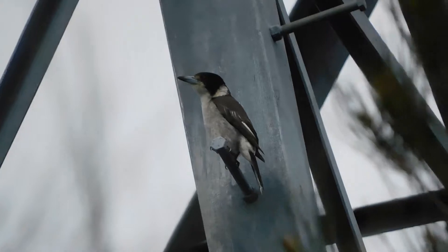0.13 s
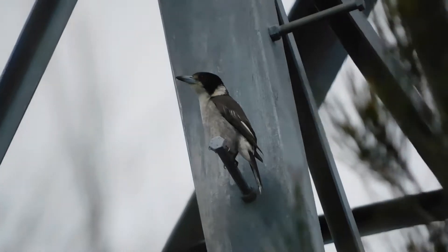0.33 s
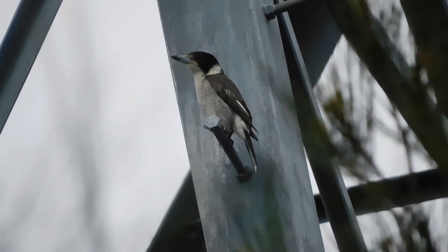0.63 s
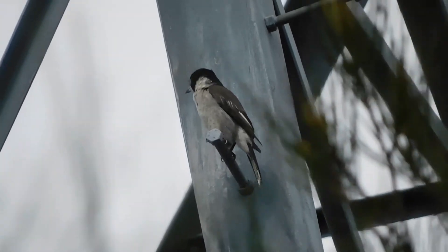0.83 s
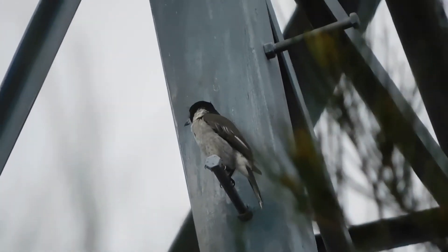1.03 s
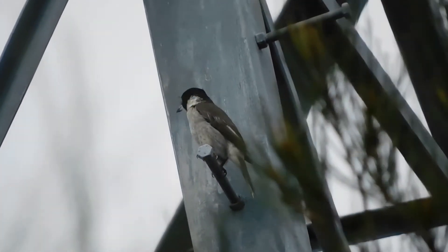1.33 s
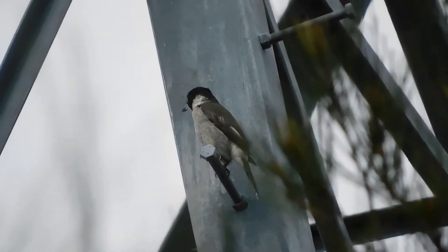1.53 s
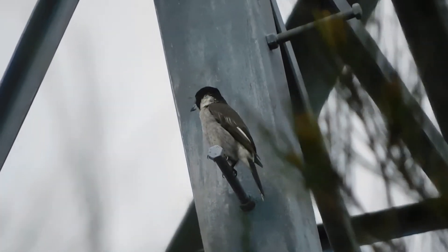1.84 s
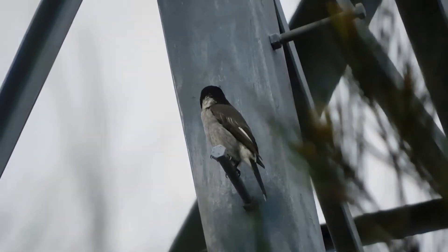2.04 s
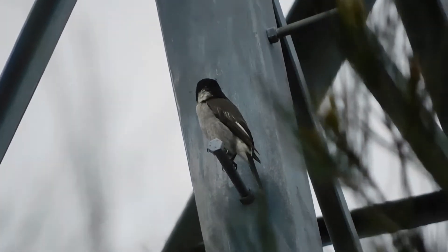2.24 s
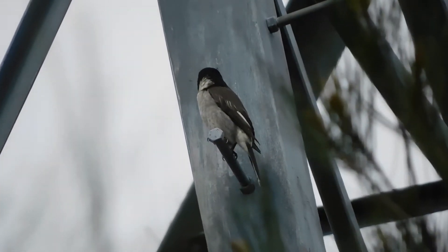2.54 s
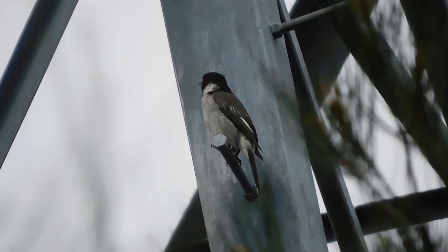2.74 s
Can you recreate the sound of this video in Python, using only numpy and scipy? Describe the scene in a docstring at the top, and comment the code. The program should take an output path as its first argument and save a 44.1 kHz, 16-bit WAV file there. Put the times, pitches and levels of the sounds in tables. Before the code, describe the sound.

A butcherbird calls outdoors, slightly to the right with a faint echo. A short rasp at 0.3 seconds leads into three brief reedy notes at about 0.4, 0.6 and 0.9 seconds. Something knocks once near 0.5. A faint hoarse tone slides down around 1.2. Thin, quiet whistles scatter through the first 1.5 seconds, then return sparsely after 2. Wind and distant traffic rumble low throughout.

```python
"""At a steel tower, a butcherbird gives a short rasp and three reedy notes, among thin slurred whistles.
The rasp is puffs of air ringing in its throat; each note is a clear tone with a buzz above it.
Something knocks once, a hoarse tone slides down, and the surroundings throw back a faint echo.
Under it all lies a steady low rumble of wind and distant traffic."""
import sys
import numpy as np
from scipy import signal
from scipy.fft import rfft, irfft
from scipy.io import wavfile
from scipy.ndimage import uniform_filter1d

SR = 44100
rng = np.random.default_rng(int(sys.argv[2]) if len(sys.argv) > 2 else 0)


def pcm_store(signal):
    """Save signal as 16-bit PCM."""
    levels = np.round(np.clip(np.atleast_2d(signal), -1, 1) * 32767)
    wavfile.write(sys.argv[1], SR, levels.astype(np.int16).T)


N = 126567


def amp(db):
    """Turns decibels into a number to multiply by."""
    return 10 ** (np.asarray(db) / 20)


def unit(x):
    """Scales a signal to an average (rms) level of 1."""
    return x / np.sqrt(np.mean(x ** 2) + 1e-20)


def look_up(rows, hz, column=1):
    """Reads a table at any frequency, blending between its rows."""
    table = np.transpose(rows)
    return np.interp(np.log(hz + 1), np.log(table[0] + 1), table[column])


def add(mix, start_s, sound):
    """Mixes a sound in at its start time."""
    part = mix[round(start_s * SR):][:len(sound)]
    part += sound[:len(part)]


def fade(t, rise_s, fall_s):
    """A loudness curve that rises, holds and falls smoothly."""
    fade_in = np.sin(np.pi / 2 * np.clip(t / rise_s, 0, 1))
    fade_out = np.sin(np.pi / 2 * np.clip((t[-1] - t) / fall_s, 0, 1))
    return fade_in * fade_out


def wander(size, hz):
    """A smooth random wobble, mostly slower than hz."""
    freqs = np.fft.rfftfreq(SR, 1 / SR)
    spectrum = rfft(rng.standard_normal(SR)) * np.exp(-(freqs / hz) ** 2)
    return unit(irfft(spectrum))[:size]


def ring(x, hz, width_hz):
    """Makes a sound ring around one pitch, which may slide."""
    turn = np.exp(2j * np.pi * np.cumsum(hz * np.ones(len(x))) / SR)
    decay = np.exp(-np.pi * width_hz / SR)
    ringing = signal.lfilter([1], [1, -2 * decay, decay ** 2], x / turn)
    return unit((turn * ringing).real)


# The rumble's tone. Each row: frequency in Hz, relative level in dB.
RUMBLE_TONE = [(12, -29), (20, 4), (59, -0.5), (103, -3), (140, -5), (232, -9), (274, -10.5), (324, -13),
               (393, -14.5), (505, -22), (725, -19), (1010, -20), (1380, -24.5), (2270, -35), (2470, -40.5),
               (3170, -47.5), (4430, -56), (5090, -58), (15500, -56.5)]
# Its width. Each row: frequency in Hz, level in dB of what differs between the ears against what they share.
RUMBLE_WIDTH = [(60, -28.3), (120, -28.5), (200, -26), (380, -16), (700, -12.7), (1290, -12), (2380, -6),
                (4400, -.3), (8000, .3)]
# Its lean to one side. Each row: frequency in Hz, left minus right level in dB.
RUMBLE_BALANCE = [(200, -.48), (1200, -1.1), (2800, -1.5), (7000, -.1)]
# Its slow drift. Each row: time in seconds, then change in dB of bass, low middle, middle and treble.
RUMBLE_DRIFT = [(.07, -4, -2.5, 0.5, 7), (.35, -1.5, 1.5, 0.5, 8.5), (.55, .5, -2, -1, 4.5),
                (0.952, -1.5, -1.5, .5, 2.5), (1.25, -1.5, -3, 1, 7), (1.47, .5, -4, .5, 3),
                (1.62, -3, -1.5, 0, 0.5), (1.82, 3.5, -1, -0.5, 0.5), (2.2, -2.5, 1, 0, 1.5),
                (2.58, 2, 1, 0, 1), (2.85, 0.5, 0, 0, 1)]
# Where the drift acts. Each row: frequency in Hz, then shares of bass, low middle, middle and treble.
DRIFT_SHARES = [(110, 1, 0, 0, 0), (180, 0, 1, 0, 0), (280, 0, 1, 0, 0), (500, 0, 0, 1, 0),
                (1600, 0, 0, 1, 0), (2800, 0, 0, 0, 1), (4500, 0, 0, 0, 1), (7500, 0, 0, 0, 0)]


def rumble(db=-37.5, flicker_db=1.17):
    """Wind and far traffic: deep noise, nearly alike in both ears, with a thin wide hiss on top."""
    size, hop = 4096, 1024  # the noise is built from short overlapping slices
    hz = np.fft.rfftfreq(size, 1 / SR)
    t = np.arange(N // hop + 5) * hop / SR
    a, b, c, d, flicker = rng.standard_normal((len(t), len(hz), 5)).T
    shared = a + 1j * b
    side = (c + 1j * d) * amp(look_up(RUMBLE_WIDTH, hz))[:, None]
    low_cut = hz ** 2 / (hz ** 2 + 14 ** 2)
    tone = amp(look_up(RUMBLE_TONE, hz)) * low_cut
    balance = amp(np.outer([.5, -.5], look_up(RUMBLE_BALANCE, hz)))
    slices = np.array([shared + side, shared - side]) * (tone * balance)[:, :, None]
    times, *bands = np.transpose(RUMBLE_DRIFT)
    drift_db = sum(np.outer(look_up(DRIFT_SHARES, hz, column), np.interp(t, times, band))
                   for column, band in enumerate(bands, 1))
    flicker = uniform_filter1d(flicker, size=3, axis=1)  # smooth over time
    flicker = unit(uniform_filter1d(flicker, size=24, axis=0))  # and over frequency
    slices *= amp(drift_db + flicker_db * flicker)
    air = signal.istft(slices, nperseg=size, noverlap=size - hop)[1][:, :N]
    return amp(db) * unit(air)


WAVER_SHARE, WAVER_HZ = 0.0063, 120  # how far and how fast a sung pitch wobbles
# Each row: start in seconds, length in seconds, first, middle and last pitch in Hz, level in dB.
THIN_WHISTLES = [ (0.064, 0.075, 2810, 2910, 2960, -60), (0.106, 0.019, 3500, 3660, 3800, -64),
                 (0.12, 0.14, 6150, 5350, 5130, -72), (0.136, 0.044, 2950, 2843, 2700, -54),
                 (.150, .100, 2070, 2200, 2130, -59), (0.179, 0.076, 2890, 2910, 2870, -75),
                 (.185, 0.059, 3200, 3280, 3300, -67), (.312, .026, 2740, 2320, 2100, -67),
                 (0.349, 0.031, 2010, 2064, 1960, -51), (.418, 0.018, 2950, 2900, 2870, -59),
                 (0.685, 0.041, 3040, 2970, 2870, -61), (0.749, 0.023, 3670, 3730, 3800, -68),
                 (0.769, 0.027, 3060, 2960, 2930, -62), (.975, 0.068, 2820, 2810, 2720, -66.5),
                 (0.998, 0.065, 3720, 3680, 3860, -72.5), (1.098, 0.034, 5100, 4510, 4580, -70),
                 (1.136, .044, 3880, 3620, 3650, -67), (1.17, 0.026, 3900, 3920, 3900, -60),
                 (1.190, 0.086, 3103, 2900, 3020, -57.5), (1.192, 0.033, 6200, 6000, 5800, -74),
                 (1.219, 0.05, 2530, 2652, 2610, -52.5), (0.762, 0.044, 1990, 1985, 1980, -57.5),
                 (1.294, 0.021, 2970, 2890, 2900, -62), (1.320, 0.028, 3550, 3520, 3470, -67),
                 (1.353, 0.07, 2840, 2996, 2850, -62), (1.432, .058, 4120, 4100, 3800, -73),
                 (2.052, 0.036, 1940, 2000, 2050, -60), (2.377, 0.104, 2230, 2250, 2365, -62),
                 (2.395, 0.077, 4520, 4500, 4420, -77), (2.841, 0.057, 4120, 4240, 4700, -66.5)]


def whistle(length, first_hz, middle_hz, last_hz, db):
    """An almost pure tone bends through three pitches."""
    t = np.arange(0, length, 1 / SR)
    bend = np.polyfit([0, .5, 1], [first_hz, middle_hz, last_hz], 2)
    hz = np.polyval(bend, t / length) * (1 + WAVER_SHARE * wander(len(t), WAVER_HZ))
    tone = unit(np.sin(2 * np.pi * np.cumsum(hz) / SR))
    flutter = 1 + 0.31 * wander(len(t), WAVER_HZ)
    edge_s = 0.29 * length
    return amp(db) * fade(t, edge_s, edge_s) * tone * flutter


def puffs(t, rate_hz, depth=0.53):
    """Hissing air is chopped into slightly uneven puffs."""
    count = np.cumsum(rate_hz * (1 + 0.088 * wander(len(t), rate_hz))) / SR
    pulses = abs(np.sin(np.pi * count)) ** 2.4
    return (1 - depth + depth * pulses) * rng.standard_normal(len(t))


# Each row: start in seconds, length in seconds, middle pitch in Hz, level in dB, share spent swelling.
THROAT_RASPS = [(0.072, .026, 5160, -65.5, 0.33), (.232, 0.082, 2710, -49, 0.9),
                (0.236, 0.075, 3500, -57.5, 0.53), (0.255, 0.078, 3940, -56.5, 0.76),
                (0.263, 0.065, 5600, -65, 0.36), (1.217, 0.025, 2350, -58, 0.46),
                (1.21, .19, 3900, -78, .25)]


def rasp(length, middle_hz, db, swell, climb=0.067):
    """Puffs of air ring in the bird's throat, climbing a little in pitch."""
    t = np.arange(0, length, 1 / SR)
    hz = middle_hz * (1 + climb * (t / length - .5))
    throat = ring(puffs(t, rate_hz=80), hz, width_hz=600)
    return amp(db) * fade(t, swell * length, (1 - swell) * length) * throat


# Where the buzz rings. Each row: pitch in Hz, width in Hz, relative level in dB.
BUZZ_RINGS = [(2500, 240, 5.5), (2790, 150, 1.5), (4450, 700, -14.5)]
# Each row: start in seconds, length in seconds, low pitch in Hz, end pitch in Hz, level in dB,
# level of the buzz against the tone in dB.
REEDY_NOTES = [(0.356, 0.0637, 1808, 2030, -41, -13.5), (.617, 0.08, 1740, 1974, -44, -9),
               (.905, 0.05, 1743, 1820, -42, -8)]


def reedy_note(length, low_hz, end_hz, db, buzz_db, buzz_hz=154, overtone_db=-33, sag_db=-13):
    """One side of the bird's voice box holds a clear tone that lifts at the end; the other buzzes."""
    t = np.arange(0, length, 1 / SR)
    scoop_hz = 128 * np.exp(-t / .005)  # the note drops onto its pitch
    hz = low_hz + (end_hz - low_hz) * (t / length) ** 3 + scoop_hz
    hz *= 1 + WAVER_SHARE * wander(len(t), WAVER_HZ)
    phase = 2 * np.pi * np.cumsum(hz) / SR
    tone = unit(np.sin(phase) + amp(overtone_db) * np.sin(2 * phase))
    flutter = 1 + .3 * wander(len(t), buzz_hz)
    air = puffs(t, buzz_hz)
    buzz = unit(sum(amp(level) * ring(air, pitch, width) for pitch, width, level in BUZZ_RINGS))
    loudness = amp(db + sag_db * (t / length) ** 2) * fade(t, rise_s=0.011, fall_s=0.0079)
    return loudness * (tone * flutter + amp(buzz_db) * buzz)


# Where the knock rings. Each row: pitch in Hz, width in Hz, relative level in dB.
KNOCK_RINGS = [(658, 150, -9), (1500, 560, -9.5), (2240, 1100, -20)]


def knock(db=-34, rise_s=.001, decay_s=0.0062):
    """A brief rough hit makes something ring at a few blurry pitches."""
    t = np.arange(0, .06, 1 / SR)
    hit = np.minimum(t / rise_s, 1) * np.exp(-t / decay_s)
    body = sum(amp(level) * ring(hit * rng.standard_normal(len(t)), pitch, width)
               for pitch, width, level in KNOCK_RINGS)
    strength = np.sqrt(np.mean(hit ** 2))
    return amp(db) * strength * unit(body)


def hoarse_slide(length_s=.27, first_hz=1720, last_hz=1486, db=-54.5):
    """Noise rings at a falling pitch, making a hoarse tone."""
    t = np.arange(0, length_s, 1 / SR)
    hz = np.linspace(first_hz, last_hz, len(t))
    tone = ring(rng.standard_normal(len(t)), hz, width_hz=190)
    return amp(db) * fade(t, rise_s=0.036, fall_s=0.062) * tone


# Each row: frequency in Hz, seconds the echo takes to fall by 60 dB.
ECHO_FADE = [(500, 0.49), (2000, 0.96), (6000, 0.57)]


def echo(sound, db=-7, bounces_per_s=2000, build_s=0.0073):
    """Sound bounces off trees and ground; low, middle and high pitches die at their own speeds."""
    bounces = rng.standard_normal((2, SR)) * (rng.random((2, SR)) < bounces_per_s / SR)
    bounces = bounces + 0.53 * bounces[::-1]  # each ear also hears some of the other side
    hz, t, slices = signal.stft(bounces, SR, nperseg=256)
    dying = amp(-60 * t / look_up(ECHO_FADE, hz)[:, None])
    building = np.minimum(t / build_s, 1)
    tail = signal.istft(slices * dying * building, SR, nperseg=256)[1]
    tail /= np.linalg.norm(tail[0])
    return amp(db) * signal.fftconvolve(sound[None], tail, axes=1)[:, :N]


# Where the song sits. Each row: frequency in Hz, left minus right level in dB, left's lead in radians.
SONG_DIRECTION = [(1790, -1.2, -.1), (2800, -1.5, -0.57), (4000, -3.5, -0.93), (5400, -4, -1.05)]


def scene():
    """The song, the knock and their echo sit a little to the right, over the rumble."""
    song = np.zeros(N)
    for voice, rows in ((whistle, THIN_WHISTLES), (rasp, THROAT_RASPS), (reedy_note, REEDY_NOTES)):
        for start_s, *settings in rows:
            add(song, start_s, voice(*settings))
    add(song, .4705, knock())
    add(song, 1.17, hoarse_slide())
    hz = np.fft.rfftfreq(N, 1 / SR)
    left_lead = look_up(SONG_DIRECTION, hz, column=2)
    left = amp(look_up(SONG_DIRECTION, hz) / 2) * np.exp(.5j * left_lead)
    placed = rfft(song + echo(song)) * np.array([left, 1 / left])  # the right ear gets the opposite
    return irfft(placed, N) + rumble()


def record(dry, silence_s=.0725, rise_s=.0015, top_hz=15800):
    """The sound opens after a moment of silence, with the very highest treble cut away."""
    opening = np.clip((np.arange(N) / SR - silence_s) / rise_s, 0, 1)
    treble_cut = signal.firwin(511, top_hz, window=("kaiser", 9), fs=SR)
    return signal.oaconvolve(dry * opening, treble_cut[None], "same")


dry = scene()
out = record(dry)
pcm_store(out)
```